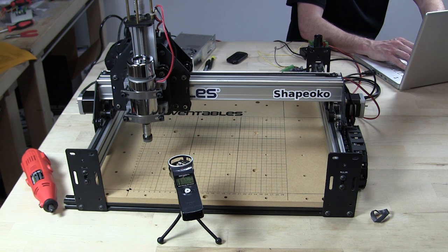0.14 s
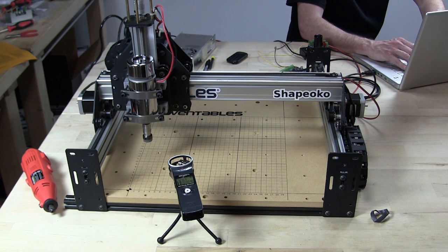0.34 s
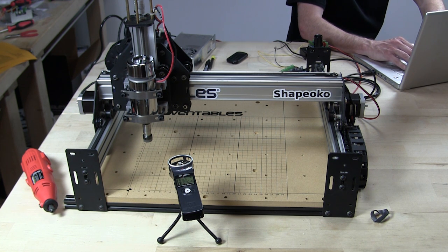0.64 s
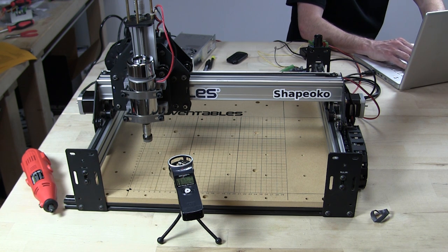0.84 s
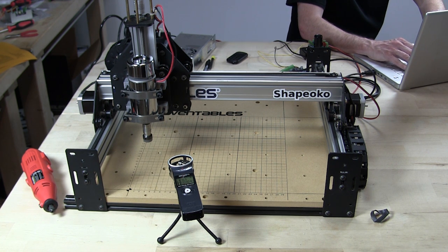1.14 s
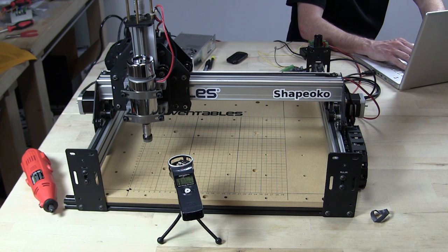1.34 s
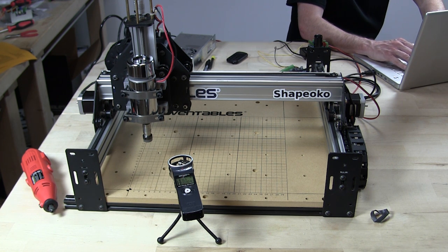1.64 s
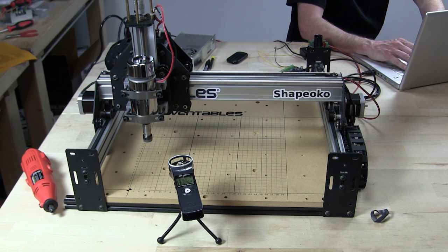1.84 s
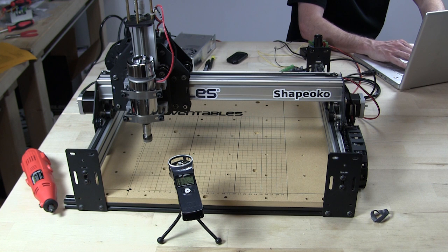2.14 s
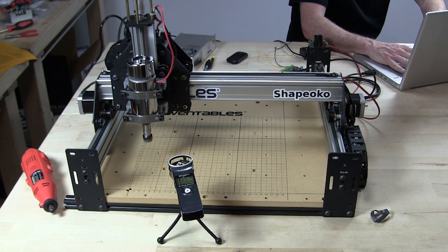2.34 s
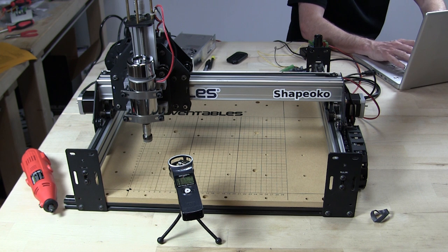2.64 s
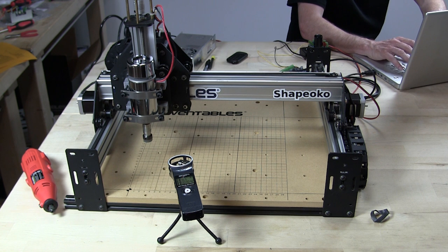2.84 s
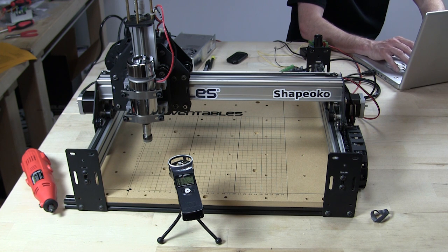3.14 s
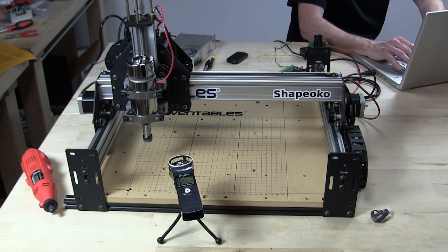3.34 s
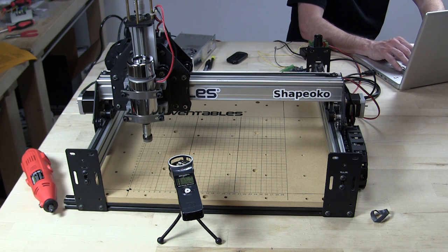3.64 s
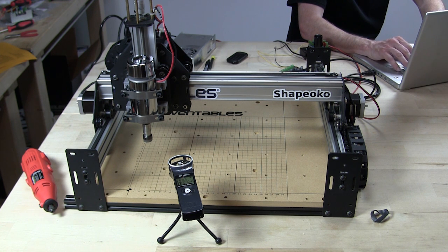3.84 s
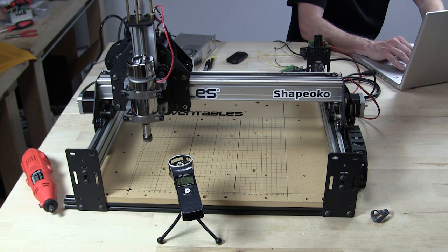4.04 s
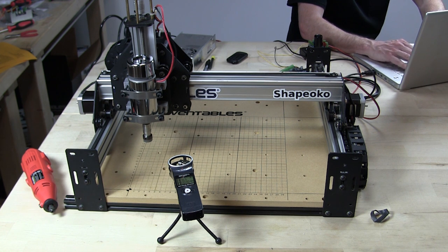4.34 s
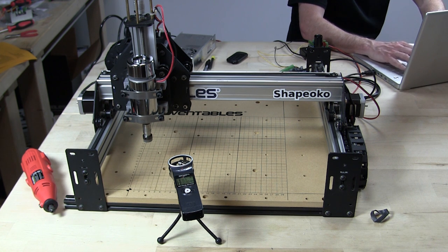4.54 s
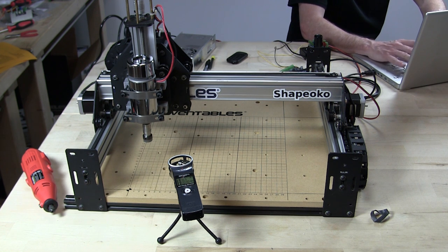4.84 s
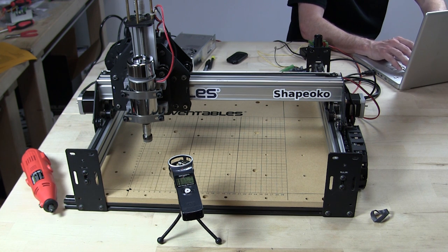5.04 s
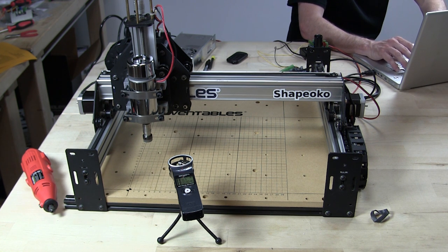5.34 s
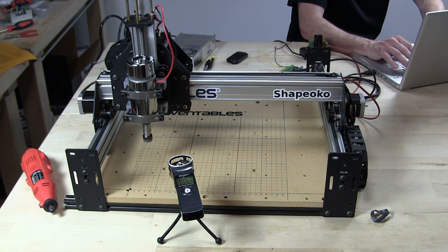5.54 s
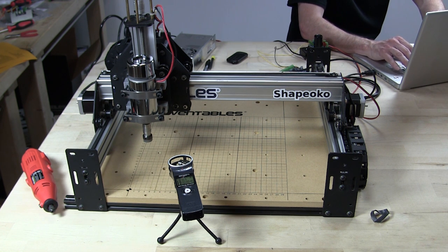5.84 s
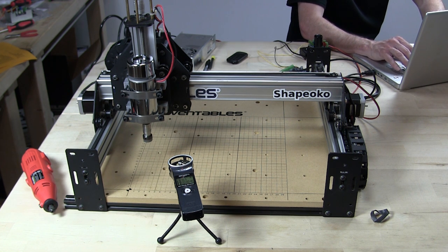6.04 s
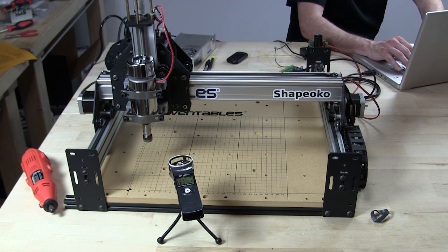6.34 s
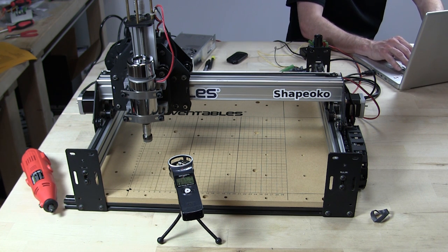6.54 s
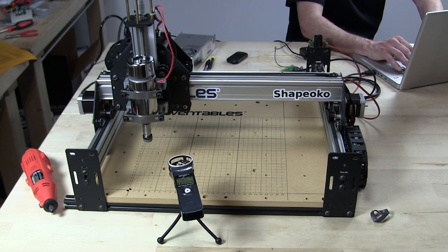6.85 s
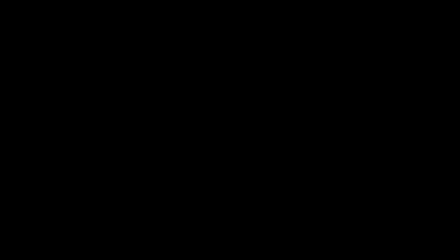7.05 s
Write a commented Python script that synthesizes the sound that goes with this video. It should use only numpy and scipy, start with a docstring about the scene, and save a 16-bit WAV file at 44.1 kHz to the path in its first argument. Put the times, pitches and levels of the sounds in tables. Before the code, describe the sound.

A small electric spindle runs with a steady, high, airy hiss and thin whine, then is switched off and begins winding down in falling pitch.

```python
"""On a workshop bench, a small DC router spindle idles at about 12500 rpm, is switched off and coasts down.
Its fan is noise and tones through vents; rotor slots whine as harmonics shaped by frame resonances.
Bearings roll, scratch and ring the housing; brush hiss is noise chopped at the commutator bar rate.
A stereo recorder with a steep low cut stands close by; the fan's draught buffets and pops on its capsules."""
import sys
import numpy as np
from scipy import signal
from scipy.fft import rfft, irfft, next_fast_len
from scipy.io import wavfile

SR = 44100
rng = np.random.default_rng(int(sys.argv[2]) if len(sys.argv) > 2 else 0)


def put_to_file(sound):
    """Save the sound as 16-bit audio at rate SR, in the file named by the first command-line argument."""
    columns = np.atleast_2d(sound).T  # one column per channel
    safe = np.clip(columns, -1, 1)
    whole_steps = np.round(safe * 32767)
    wavfile.write(sys.argv[1], SR, whole_steps.astype(np.int16))


N = 316638
TIME = np.arange(N) / SR
PADDED = next_fast_len(N + SR // 10, True)
FREQ = np.maximum(np.fft.rfftfreq(PADDED, 1 / SR), 1)

# Shaft speed under power, creeping up as the motor warms. Each row: time in seconds, speed in turns/s.
RUNNING = [(2.3, 207.45), (3.5, 207.8)]
# Coasting: drag grows with speed, friction is constant.
OFF_S, DRAG_S, FRICTION_HZ_PER_S = 5.4035, 2.2992, 33.83

# Cooling-air rush spectrum. Each row: frequency in Hz, relative level in dB.
AIR = [(370, 0.5), (430, 2), (520, -1.5), (780, 1.5), (850, -1), (1020, -2), (1180, -4), (1420, -3),
       (1650, 1), (2450, -4), (4300, -1.5), (4700, -8), (6000, -13.5), (7200, -29)]
# Air resonances of vents and shell. Each row: frequency in Hz, width in Hz, relative level in dB.
VENTS = [(719, 22.4, 5), (2986, 270, -1), (5075, 130, 4.5), (5713, 136, 3), (6654, 63, -4.5)]
# Fan tones. Each row: multiple of shaft speed, rms level in dB before the sway.
FAN_TONES = [(5, -63), (6, -73), (7, -68), (8, -63), (17, -71), (18, -68)]
# Sway of the fan tones: a dip, then a rise. Each row: time in seconds, gain in dB.
FAN_SWAY = [(0, -1.5), (2.5, -3.5), (3.5, -0.5), (5.3, 3)]

SLOT_COUNT = 12  # also the commutator bar count
# Rotor slot whine. Each row: harmonic of slot rate, full-speed rms in dB before the frame, fade exponent.
WHINE = [(1, -52.5, 2.7), (2, -52.5, 2.2), (3, -58.5, 1.8), (4, -55.5, 1.85), (5, -54.5, 2.1)]
# Frame resonances shaken by the whine. Each row: frequency in Hz, width in Hz, peak gain in dB.
FRAME = [(1540, 300, -1), (2170, 110, 4), (2350, 210, 0), (2740, 200, -3), (2985, 150, 3), (3420, 260, -2),
         (3735, 240, 7), (4545, 110, -1.5), (4955, 140, -5), (5658, 180, -6), (6900, 1700, -15)]

# Bearing ball ripple. Each row: multiple of shaft speed, rms in dB relative to the rolling noise force.
RIPPLE = [(10, -22.5), (28, -24), (32, -31), (42, -27), (52, -21), (56, -30.5)]
# Rolling noise spectrum in the housing. Each row: frequency in Hz, relative level in dB.
ROLLING = [(400, -8.5), (720, -11.5), (1200, -14.5), (1700, -13.5), (1900, -10.5), (2200, -9), (2820, -9),
           (3050, 1.5), (3220, -4), (3800, -10), (4100, -13), (5200, -7.5), (5600, -19.5), (6700, -10.5),
           (8000, -23.5)]
# Stray of a rough spot from its angle on each turn.
SLIP_TURNS = 0.0022

# Brush hiss spectrum. Each row: frequency in Hz, relative level in dB.
BRUSH = [(3000, 2), (6800, -1), (8050, 4.5), (8550, 0), (9100, 2.5), (9400, 6.5), (9900, 3), (11700, 0.5),
         (13050, 2.5), (13300, -7.5), (14300, -4.5), (14650, -4.5), (15100, -14.5)]
# Brush spring rings. Each row: frequency in Hz, width in Hz, relative level in dB.
SPRINGS = [(12460, 80, 5), (13920, 90, 8), (14630, 110, -0.5)]
# Commutator buzz. Each row: multiple of shaft speed, rms in dB relative to the unchopped rubbing noise.
BUZZ = [(45, -25.5), (60, -28), (61, -24), (72, -22.5), (84, -21)]
# Harder brush rubbing. Each row: start in seconds, length in seconds, swell in dB.
RUBS = [(1.33, 0.49, 3), (2.32, 0.66, 2.5)]
RUB_RAMP_S = 0.14
# Level at the start, easing as the brushes settle.
BRUSH_DB, SETTLE_DB_PER_S = -50.5, -0.25

# Bearing housing rings. Each row: frequency in Hz, width in Hz, relative level in dB.
HOUSING = [(3020, 110, 0), (3890, 170, -5.5)]

# Stereo width. Each row: frequency in Hz, side minus mid in dB.
WIDTH = [(380, -15), (700, -19.5), (900, -11.5), (1400, -16), (2000, -26.5), (2700, -10.5), (3050, -24),
         (3500, -13.5), (4300, -1.5), (4700, -11.5), (5050, -12.5), (5650, -17), (7000, -5), (9000, -3),
         (15000, 1)]
# Stereo lean. Each row: frequency in Hz, left minus right gain in dB.
LEAN = [(380, -1), (700, 0.55), (2400, -0.51), (4400, 1.5), (8000, -0.16), (15000, -.7)]
# Draught pops. Each row: time in seconds, peak in dB before the recorder, pitch in Hz, decay in seconds,
# capsule (0 left, 1 right).
POPS = [(0.4674, -23.5, 950, 0.001, 1), (1.0202, -22.5, 576, 0.00058, 1), (2.2286, -26.5, 436, 0.0019, 0),
        (2.2338, -28, 437, 0.0019, 0), (2.273, -29, 940, 0.0026, 0), (2.4991, -30, 930, 0.0025, 0),
        (2.703, -25, 1050, .0006, 1), (4.895, -27, 400, 0.0023, 0), (4.956, -22.5, 1020, 0.00055, 1),
        (5.3396, -23.5, 410, 0.0035, 1), (5.3888, -25, 980, 0.0017, 1)]
# Recorder low cut. Each row: frequency in Hz, gain in dB.
LOW_CUT = [(30, -57), (150, -53), (225, -50.5), (275, -40), (320, -24.5), (355, -4), (380, -1)]
TOP_HZ = 15750


def undb(db):
    """Decibels to gain."""
    return np.exp(np.asarray(db) * (np.log(10) / 20))


def unit(x):
    """Scale to rms 1."""
    return x / np.sqrt(np.mean(x ** 2))


def curve(rows):
    """Join (seconds, value) rows by straight lines."""
    return np.interp(TIME, *np.transpose(rows))


def colour(points):
    """Gain per frequency from (Hz, dB) points, straight in dB over log frequency."""
    hz, db = np.transpose(points)
    return undb(np.interp(np.log(FREQ), np.log(hz), db))


def resonances(modes):
    """Summed complex response of (Hz, width Hz, dB) modes."""
    return sum(undb(db) / (1 + 1j * (FREQ ** 2 - hz ** 2) / (FREQ * width_hz))
               for hz, width_hz, db in modes)


def shape(x, response):
    """Pass a sound through a frequency response."""
    return irfft(rfft(x, PADDED) * response, PADDED)[..., :N]


def noise(response=1):
    """Fresh Gaussian noise with the given response."""
    return shape(rng.standard_normal(N), response)


def walk(rate_hz):
    """Smooth random curve of rms 1, drawn from rate_hz random values a second."""
    smooth = signal.resample(rng.standard_normal(1024), 8192)
    place = TIME * rate_hz * 8  # eight points per random value
    return unit(np.interp(place, np.arange(len(smooth)), smooth))


def tones(rows, turns, waver_db):
    """Wavering sines phase-locked to a rotation, from (multiple, rms dB) rows."""
    start_turns = rng.random(len(rows))
    total = 0
    for (multiple, db), start in zip(rows, start_turns):
        gain = undb(db + waver_db * walk(14))
        total = total + gain * np.sin(2 * np.pi * (round(multiple) * turns + start))
    return np.sqrt(2) * total


def shaft():
    """Turns per second: near steady under power, then slowed by drag and friction."""
    coasted_s = np.maximum(TIME - OFF_S, 0)
    friction_hz = FRICTION_HZ_PER_S * DRAG_S
    return (curve(RUNNING) + friction_hz) * np.exp(-coasted_s / DRAG_S) - friction_hz


def fan(speed, turns, air_db=-40.0, power=3.36, flutter_db=0.59):
    """Air rushes through the vents and excites their resonances; it dies quickly as speed drops."""
    vent_power = sum(np.abs(resonances([vent])) ** 2 for vent in VENTS)
    spectrum = np.sqrt(colour(AIR) ** 2 + vent_power)
    rush = unit(noise(spectrum)) * undb(air_db + flutter_db * walk(16))
    hum = tones(FAN_TONES, turns, waver_db=3.0) * undb(curve(FAN_SWAY))
    return (rush + hum) * speed ** power


def rotor(speed, turns, waver_db=1.1):
    """Slots whine, weaker as they slow; falling harmonics flare when crossing frame resonances."""
    slots = SLOT_COUNT * turns
    whine = sum(tones([(k, db)], slots, waver_db) * speed ** power for k, db, power in WHINE)
    frame = sum(undb(db) / (1 + ((FREQ ** 2 - hz ** 2) / (FREQ * width_hz)) ** 2)
                for hz, width_hz, db in FRAME)
    return shape(whine, frame)


def scratches(speed, turns, count=90):
    """The same rough spots of a turning surface tick every turn, never at quite the same angle."""
    spots = rng.random(count)
    angles = (np.arange(int(turns[-1]) + 1)[:, None] + spots).ravel()
    angles = angles + SLIP_TURNS * rng.standard_normal(len(angles))
    at = np.interp(angles[angles < turns[-1]], turns, np.arange(N))
    size = 1 + 0.54 * rng.standard_normal(len(at))
    # Split each tick between its two nearest samples.
    whole, part = at.astype(int), at % 1
    ticks = np.bincount(whole, size * (1 - part), N + 1)
    ticks = ticks + np.bincount(whole + 1, size * part, N + 1)
    # Offset the thinning of ticks as the shaft slows.
    return unit((ticks[:N] - ticks.mean()) / np.sqrt(speed))


def bearings(speed, turns, roll_db=-50, power=1.21, worn_db=-5, throb=0.23, flutter_db=1.1):
    """Balls roll over worn races, pressed harder once a turn; this outlasts the air."""
    load = (1 + throb * np.sin(2 * np.pi * turns)) * undb(flutter_db * walk(23))
    worn = undb(worn_db) * scratches(speed, turns)
    force = noise() + worn + tones(RIPPLE, turns, waver_db=4.0)
    return undb(roll_db) * unit(shape(force, colour(ROLLING))) * load * speed ** power


def contact():
    """Brush level in dB: eases slowly, swells during each spell of harder rubbing."""
    swells_db = 0
    for start_s, length_s, db in RUBS:
        inside_s = np.minimum(TIME - start_s, start_s + length_s - TIME)
        swells_db = swells_db + db * np.clip(inside_s / RUB_RAMP_S + 0.5, 0, 1)
    return BRUSH_DB + SETTLE_DB_PER_S * TIME + swells_db


def brushes(speed, turns, scratch_db=-8, chop=0.36, flutter_db=0.52, power=1.37,
            top_hz=11000, top_power=0.7):
    """Carbon slides over bars: chopped hiss, repeating scratches, thin buzz; softer and duller when slow."""
    bar_phase = 2 * np.pi * SLOT_COUNT * turns
    rub = noise() * (1 + chop * np.sin(bar_phase))
    rub = rub + undb(scratch_db) * scratches(speed, turns)
    rub = rub + tones(BUZZ, turns, waver_db=3.0)
    hiss = unit(shape(rub, colour(BRUSH)) + noise(resonances(SPRINGS)))
    body = shape(hiss, 1 / (1 + (FREQ / top_hz) ** 10))
    dulled = body + (hiss - body) * speed ** top_power
    return dulled * speed ** power * undb(contact() + flutter_db * walk(25))


def housing(speed, ring_db=-63, power=0.62, flutter_db=3.0):
    """Bearings keep the housing ringing unevenly; it stands out once the air has died down."""
    ring = unit(noise(resonances(HOUSING)))
    return ring * undb(ring_db + flutter_db * walk(12)) * speed ** power


def microphones(x, direct=0.35, room_t60_s=0.7):
    """Direct sound leads in phase at the left capsule; workshop reflections differ on the two sides."""
    echoes = rng.standard_normal(SR) * np.exp(-np.log(1000) * TIME[:SR] / room_t60_s)
    reflected = signal.fftconvolve(x, echoes / np.linalg.norm(echoes))[:N]
    share = np.clip(direct, 0, 1)
    quarter_cycle_ahead = shape(x, 1j)
    side = share * quarter_cycle_ahead + np.sqrt(1 - share ** 2) * reflected
    side = shape(side, colour(WIDTH))
    lean = np.sqrt(colour(LEAN))
    return np.array([shape(x + side, lean), shape(x - side, 1 / lean)])


def draught(speed, buffet_db=-57, gust_db=5.0, power=2.0):
    """Fan eddies buffet each capsule on its own; the strongest ones pop as short two-sided bursts."""
    eddies = colour([(350, 3), (900, -5), (1500, -10.5), (3000, -28.0)])  # Hz, dB
    out = np.array([unit(unit(noise(eddies)) * undb(gust_db * walk(60))) for _ in range(2)])
    out = out * undb(buffet_db) * speed ** power
    for pop_s, db, hz, decay_s, capsule in POPS:
        near = np.abs(TIME - pop_s) < 0.03
        age_s = TIME[near] - pop_s
        pop = np.exp(-np.abs(age_s) / decay_s) * np.cos(2 * np.pi * hz * age_s)
        out[round(capsule), near] += undb(db) * pop
    return out


def scene(wobble=0.0002):
    """One shaft speed, wobbling slightly, drives every part of the spindle."""
    hz = shaft() * (1 + wobble * walk(9))
    speed, turns = hz / hz[0], np.cumsum(hz) / SR  # speed relative to the start
    spindle = fan(speed, turns) + rotor(speed, turns) + bearings(speed, turns)
    spindle = spindle + brushes(speed, turns) + housing(speed)
    return microphones(spindle) + draught(speed)


def record(dry):
    """The recorder removes the bass and the very top; both ends get a 4 ms fade."""
    fade = np.clip(np.minimum(TIME, TIME[-1] - TIME) / 0.004, 0, 1)
    top_cut = signal.ellip(10, 0.1, 70, TOP_HZ, fs=SR, output="sos")
    return signal.sosfilt(top_cut, shape(dry, colour(LOW_CUT)) * fade)


dry = scene()
out = record(dry)
put_to_file(out)
```